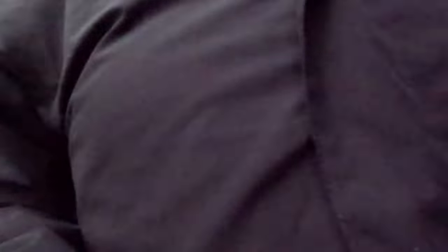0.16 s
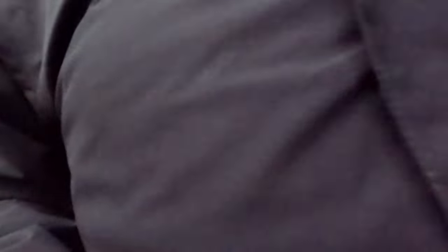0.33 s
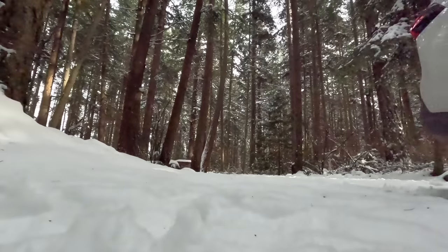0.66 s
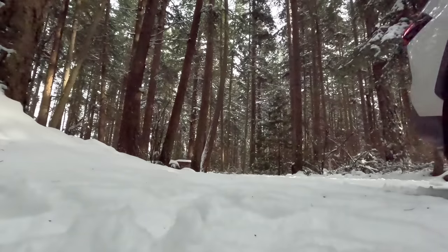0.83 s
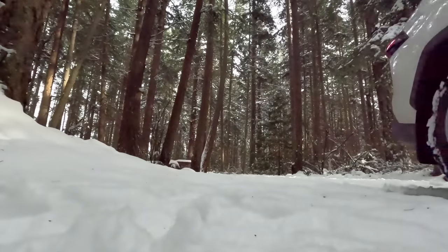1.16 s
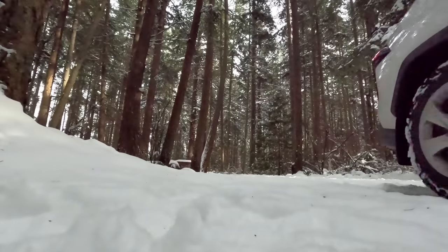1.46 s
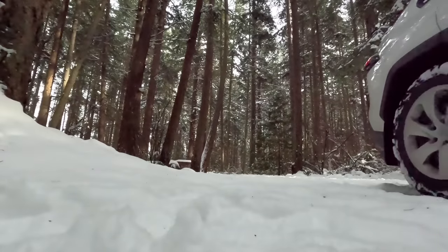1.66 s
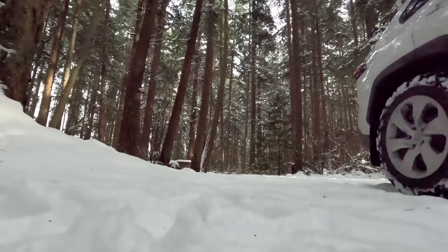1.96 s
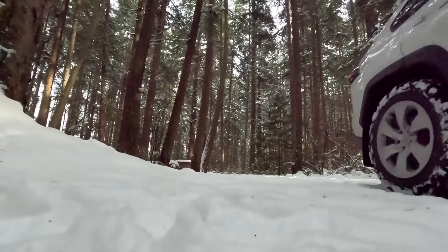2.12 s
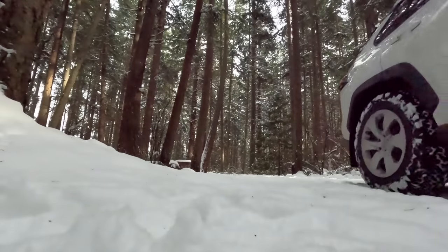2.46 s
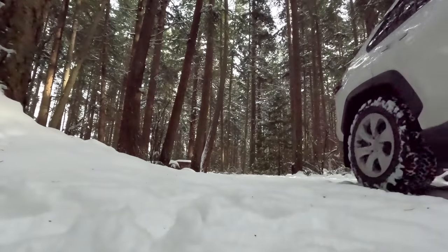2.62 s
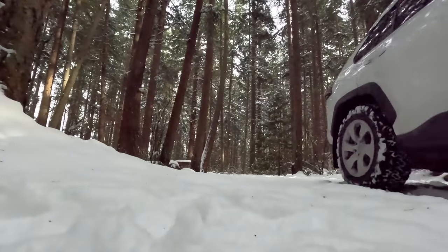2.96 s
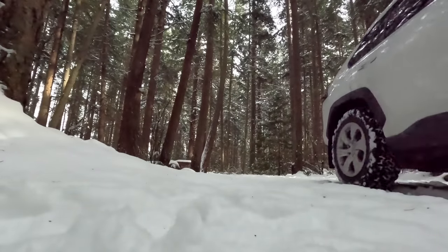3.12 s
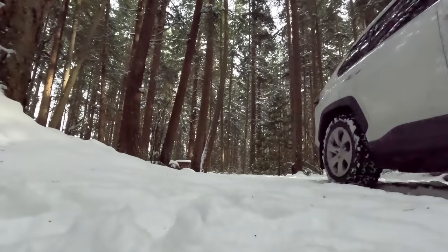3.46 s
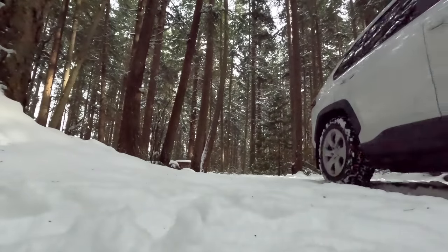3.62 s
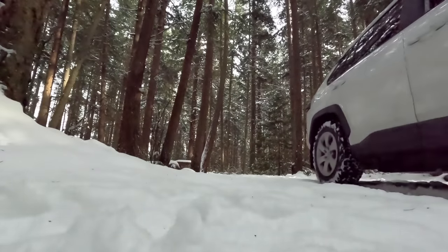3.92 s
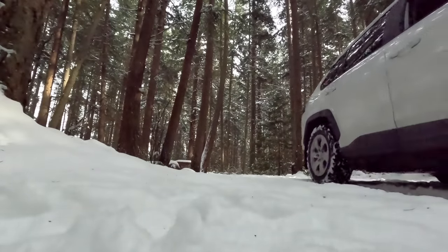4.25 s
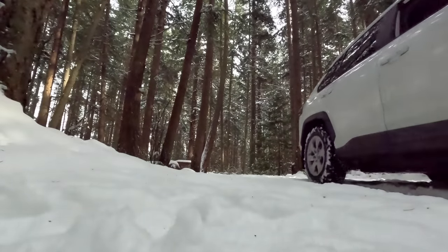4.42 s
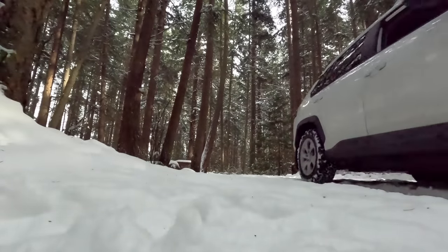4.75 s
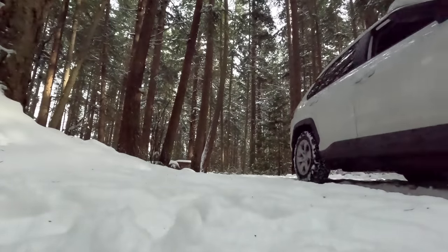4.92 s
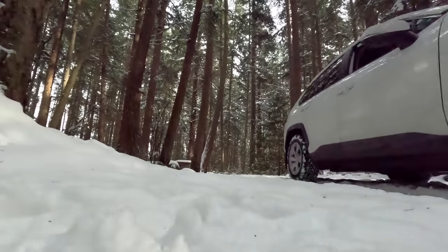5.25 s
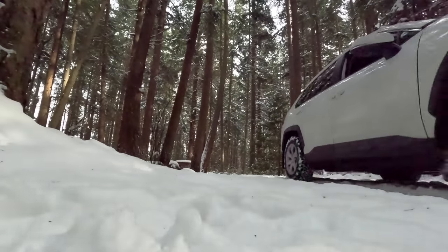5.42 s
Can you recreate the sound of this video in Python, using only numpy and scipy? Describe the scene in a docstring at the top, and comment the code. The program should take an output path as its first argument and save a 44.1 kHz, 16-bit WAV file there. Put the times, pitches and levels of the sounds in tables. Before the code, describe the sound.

A jacket and fingers rub and knock a small camera for under half a second, lumpy and scratchy. A tiny gap of dead silence follows, then a car backs slowly through a snowy forest: low throbbing exhaust, faint fan hum, dull thumps, snow crunching and ice crust cracking. Close to the ground, the stereo microphone catches engine rattle and hiss growing as the nose draws level, with a short rev late on.

```python
"""In a snowy forest, a jacket brushes a small camera as it is set down; after a short silence a car backs slowly.
The handling is lumpy and scratchy filtered noise, with knuckle bumps and cloth snaps.
The exhaust throb is a stack of sine waves that follows the engine speed; the fan hum is wavering tones.
Body roar, packed snow under the tyres, engine rattle and intake hiss are coloured, grainy noise.
Thumps, crunches and cracks are short ringing bursts; the engine bay hisses as the nose draws level."""
import sys
import numpy as np
from scipy import signal
from scipy.fft import rfft, irfft, next_fast_len
from scipy.io import wavfile
from scipy.ndimage import uniform_filter1d

SR = 44100
rng = np.random.default_rng(int(sys.argv[2]) if len(sys.argv) > 2 else 0)


def generate_wav(sig):
    """Save sig (samples, or channels by samples) to the path in sys.argv[1] as 16-bit PCM at SR."""
    pcm = np.round(np.clip(np.atleast_2d(sig).T, -1, 1) * 32767).astype(np.int16)
    wavfile.write(sys.argv[1], SR, pcm)


N = 246166
T = np.arange(N) / SR  # time in s
IDLE_HZ = 28  # engine firings per s at idle


def amp(db):
    """Turn dB into a plain multiplier for the wave."""
    return 10 ** (np.asarray(db) / 20)


def evened(x):
    """Scale a sound to an average (RMS) strength of 1."""
    return x / np.sqrt(np.mean(x ** 2) + 1e-20)


def read(points, hz):
    """Read a curve of (f/Hz, value) between its points, on a scale close to musical pitch."""
    f, value = np.transpose(points)
    return np.interp(np.log(hz + 1), np.log(f + 1), value)


def over_time(points):
    """Read a curve of (t/s, value) at every sample."""
    t, value = np.transpose(points)
    return np.interp(T, t, value)


def add(mix, s, sound):
    """Lay a short sound into the mix at s seconds, cut off at the end."""
    part = mix[:, round(s * SR):][:, :sound.shape[1]]
    part += sound[:, :part.shape[1]]


def drift(hz):
    """Slow, smooth chance: noise with only the rates below hz kept."""
    size = next_fast_len(N)
    keep = np.fft.rfftfreq(size, 1 / SR) < hz
    slow = irfft(keep * rfft(rng.standard_normal(size)), size)
    return evened(slow[:N])


def textured(spectrum, per_s, spread_db, wash, patchy_db, size=1024, held=False):
    """Grains of random size over a wash of noise, coloured and patchy, heard by two close ports."""
    # likeness of the two ports, 1 = same, in the hand: f/Hz, likeness
    same_held = [(60, 0.91), (400, 0.84), (1000, 0.93), (2700, 0.67), (4500, 0.96), (8500, 1),
                 (12000, 0.34)]
    # the same with the engine far, then alongside: f/Hz, likeness
    same_far = [(400, 1), (1300, 0.96), (2200, 0.81), (6000, 0.64), (9600, 0.56), (12000, 0.14)]
    same_near = [(60, 1), (400, .99), (1100, .9), (3000, .82), (4200, .58), (6500, .97), (10000, .94),
                 (12500, .6)]
    # left over right with the engine far, then alongside: f/Hz, level/dB
    lean_far = [(300, 0), (1300, 2), (2400, 2.5), (4400, 0)]
    lean_near = [(200, 0), (1300, -2), (4400, -4.5), (7000, -0.5)]
    # how far left leads with the engine alongside: f/Hz, phase/rad
    lead = [(500, -1.2), (2000, -0.3), (3300, -1.9), (4200, -2.5), (5200, -1.1)]
    # the engine draws level, on the clock that includes the lead-in: start/s, end/s
    approach = (4.1, 4.6)

    shape = (2, N + 2 * size)  # a lead-in and a tail of size samples, trimmed below
    sizes = amp(spread_db * np.minimum(rng.exponential(1, shape), 5))
    grains = sizes * (rng.random(shape) < per_s / SR) * rng.choice([-1., 1.], shape)
    wash = np.clip(wash, 0, 1)
    drive = np.sqrt(1 - wash) * evened(grains) + np.sqrt(wash) * rng.standard_normal(shape)
    hz, t, z = signal.stft(drive, SR, nperseg=size, noverlap=size * 3 // 4)

    # smooth chance over both pitch and time makes the patches
    patches = uniform_filter1d(rng.standard_normal(z.shape[1:]), size=12, axis=0)
    patches = evened(uniform_filter1d(patches, size=12, axis=1))

    near = np.interp(t, approach, [0, 1])
    if held:
        same = read(same_held, hz)[:, None]
    else:
        same = np.outer(read(same_far, hz), 1 - near) + np.outer(read(same_near, hz), near)
    same = np.clip(same, -1, 1)
    mid = np.sqrt((1 + same) / 2) * z[0]
    side = np.sqrt((1 - same) / 2) * z[1]
    lean_db = np.outer(read(lean_far, hz), 1 - near) + np.outer(read(lean_near, hz), near)
    # half of the lead and lean goes to each port, in opposite directions
    turn = np.exp(.5j * np.outer(read(lead, hz), near)) * amp(0 if held else lean_db / 2)
    ports = np.array([(mid + side) * turn, (mid - side) / turn])
    ports = ports * amp(read(spectrum, hz)[:, None] + patchy_db * patches)
    sound = signal.istft(ports, SR, nperseg=size, noverlap=size * 3 // 4)[1]
    return evened(sound[:, size:N + size])


def bursts(events, t60, sharpness, apart, top=8.2, fracture=0.61):
    """Each break is a fracture with a faint ragged tail, ringing around its centre and dull above top times that."""
    out, t = np.zeros((2, N)), np.arange(4096) / SR
    for s, db, hz in events:
        noise = rng.standard_normal((4, len(t)))
        ragged = amp(2.94 * evened(uniform_filter1d(noise[3], size=60)))
        fade = amp(-60 * t / t60) + amp(-17.5 - 16 * t / t60)  # a quick fall, then the faint tail
        puff = (noise[0] + apart * noise[1:3]) * ragged * fade  # apart sets how much the ports differ
        puff[:, 0] += fracture * np.linalg.norm(puff[0])  # the first click
        b, a = signal.iirpeak(hz, sharpness, SR)
        ring = signal.lfilter(b, a, signal.lfilter(b, a, puff))
        dulling = signal.butter(2, min(top * hz, 10500), fs=SR, output="sos")
        ring = signal.sosfilt(dulling, ring)
        add(out, s, amp(db) * ring / abs(ring).max())
    return out


def rubs():
    """Each rub starts and stops quickly and grows louder as the cloth tightens."""
    # cloth dragged over the case: start/s, length/s, final level/dB, swell during the rub/dB, dullness/0-1
    rub_rows = [(0, 0.026, -34, 3, 0.23), (0.029, 0.02, -15.5, 3, 0.91), (0.055, .088, -16, 10, 0.44),
                (0.153, .23, -34, 7.5, 0.26)]
    edge_s = 0.003  # fade just before and just after each rub
    level, dull = np.zeros(N), np.zeros(N)
    for s, length, db, swell_db, dullness in rub_rows:
        on = np.clip(np.minimum(T - s, s + length - T) / edge_s + 1, 0, 1)
        still_to_come = np.clip(1 - (T - s) / length, 0, 1)
        gain = on * amp(db - swell_db * still_to_come)
        level, dull = level + gain, dull + gain * dullness
    return level, np.clip(dull / (level + 1e-9), 0, 1)


def bumps():
    """Each bump pushes the case in and lets it spring back once: one fading sine cycle."""
    # knuckles on the case: t/s, level before the fade/dB, f/Hz
    bump_rows = [(.008, -9.5, 85), (.03, -11, 30), (.044, -9, 110), (.069, -13, 109.5), (.099, -13, 110),
                 (.138, -10, 110), (.343, -18, 130)]
    out = np.zeros(N)
    for s, db, hz in bump_rows:
        turn = np.clip((T - s) * hz, 0, 1)
        out -= amp(db - 8.0 * turn) * np.sin(2 * np.pi * turn)
    return out


def handling():
    """Fingers and cloth on the case: lumpy rumble, scratchy rustle, a few snaps."""
    # colour of the rumble, then of the rustle: f/Hz, relative level/dB per Hz
    rumble_spectrum = [(5, -28), (12, 8), (30, 3.5), (70, -9), (170, -11), (450, -27.5), (900, -58.5)]
    rustle_spectrum = [(180, -46), (300, -1.5), (2000, -11), (3500, -3), (5900, -2.5), (9640, -13),
                       (15000, -49)]
    # rumble through the case while it is held, before the left-right tilt: t/s, level/dB
    grip = [(0, -15.5), (.06, -13.5), (.105, -27), (.15, -17), (.19, -24), (.378, -22)]
    # cloth snaps: t/s, peak level/dB, centre f/Hz
    snap_rows = [(.031, -9.5, 450), (.046, -10.5, 1460), (.104, -7, 3970), (.134, -6, 3460),
                 (.193, -22, 706), (.268, -19, 5400), (.2715, -19.5, 970)]

    level, dull = rubs()
    rumble = textured(rumble_spectrum, 300, 2, wash=.8, patchy_db=1, size=4096, held=True)
    rustle = textured(rustle_spectrum, 3500, 2.9, wash=.62, patchy_db=1.8, size=256, held=True)
    muffled = evened(signal.lfilter(*signal.butter(2, 2500, fs=SR), rustle))
    rustle = np.sqrt(1 - dull) * rustle + np.sqrt(dull) * muffled
    snaps = bursts(snap_rows, 0.024, 0.58, apart=0.25)
    tilt = amp([[-.9], [.9]])  # left a little softer, right a little louder
    return tilt * (amp(over_time(grip)) * rumble + bumps()) + level * rustle + snaps


def exhaust(turns, hz):
    """Pressure builds and drops once a firing; the pipe rings on in the overtones, which lag."""
    # tailpipe colour of the overtones: f/Hz, relative level/dB
    pipe = [(50, 0), (85, -2), (112, -8), (140, -3), (170, -2), (197, 0), (222, -16), (340, -18)]
    # level of the overtones before the pipe's colour and the wavering: t/s, level/dB
    overtones = [(.49, -40), (1.6, -38), (2.8, -54.5), (3.93, -47.5), (4.45, -46), (5.58, -51.5)]
    # the body moves between tailpipe and microphone, softening the lowest tone
    shade_db = 5 / (1 + np.exp((2.1 - T) / 0.32))  # 5 dB in the end, halfway at 2.1 s
    # the lowest tone thins out as the engine speeds up
    throb_db = -28 - shade_db - 0.74 * (hz - IDLE_HZ)
    over_db = over_time(overtones)
    out = -amp(throb_db) * np.sin(2 * np.pi * turns)
    for k in range(2, 13):
        lag = .018 * k ** 3 + .2 * drift(3)  # radians
        level_db = over_db + read(pipe, k * hz) + 1.6 * drift(5)
        out -= amp(level_db) * np.sin(2 * np.pi * k * turns - lag)
    return np.sqrt(2) * out


def hum(tones, waver_db):
    """Steady tones that waver a little in level and phase."""
    out = np.zeros(N)
    for hz, db in tones:
        level = amp(db + waver_db * drift(7))
        out += level * np.sin(2 * np.pi * hz * T + .8 * drift(4))
    return np.sqrt(2) * out


def fan():
    """The fan swells as the nose comes near, over an even hum."""
    # the fan's tones: f/Hz, relative level/dB
    fan_tones = [(168, 1.5), (473, -15)]
    # a fainter, even hum: f/Hz, level before the wavering/dB
    even_tones = [(337, -50.5)]
    quietest_db, swell_db, quietest_s = -49, 10, 1.6  # gain, its swell by the end, time of the lowest
    swell = ((T - quietest_s) / (T[-1] - quietest_s)) ** 2
    return amp(quietest_db + swell_db * swell) * hum(fan_tones, waver_db=2.2) + hum(even_tones, waver_db=0.8)


def body_roar():
    """The low roar of the body: deep noise that rises and falls."""
    # colour of the roar: f/Hz, relative level/dB per Hz
    roar_spectrum = [(8, -16), (25, -7), (50, 4), (170, -1.5), (340, -8), (520, -21.5), (880, -88)]
    # loudness of the roar: t/s, level/dB
    body = [(.49, -57), (1.12, -30.5), (1.45, -43), (1.7, -46.5), (2, -39.5), (2.85, -37.5), (3.3, -32.5),
            (4.6, -34.5), (5.3, -39), (5.58, -31)]
    return amp(over_time(body)) * textured(roar_spectrum, 80, 3, wash=.9, patchy_db=1, size=4096)


def tyre_crush():
    """Tyres crush packed snow: many small grains over a low wash of noise."""
    # colour of the crushing: f/Hz, relative level/dB per Hz
    crush_spectrum = [(88, -44), (150, -3), (265, -9.5), (357, -12.5), (472, -9), (1500, -33), (1950, -50),
                      (3300, -120)]
    # loudness of the crushing: t/s, level/dB
    tyres = [(.49, -48), (.75, -45), (1.5, -44), (2.6, -37.5), (3.6, -36.5), (4.2, -37.5), (4.7, -35),
             (5, -36), (5.58, -38)]
    return amp(over_time(tyres)) * textured(crush_spectrum, 700, 3.1, wash=0.61, patchy_db=2.0)


def clatter(turns):
    """Each firing knocks the block; its modes ring unevenly, now one and now another, over a fine even rattle."""
    # colour of the rattle: f/Hz, relative level/dB per Hz
    rattle_spectrum = [(410, -5.5), (700, -2), (1110, -9.5), (1760, -9), (3130, -11), (3870, -12),
                       (4700, -23.5), (6500, -54), (11000, -120)]
    # block modes rung by each firing: f/Hz, width/Hz, relative level/dB
    block = [(1707, 170, 4), (2015, 120, 1.5), (2585, 200, -1), (3150, 200, -1.5)]
    # loudness of the whole clatter: t/s, level/dB
    bay = [(.49, -60), (1.45, -58), (2, -53), (2.85, -49.5), (3.5, -49), (4.25, -48), (4.55, -41),
           (5, -44.5), (5.58, -50.5)]

    firings = int(turns[-1]) + 2
    strength = amp(2.5 * rng.standard_normal((firings, len(block))))  # each firing hits each mode anew
    strength = strength[turns.astype(int)].T
    knock = uniform_filter1d(np.exp(-(turns % 1) / 0.2), size=130)
    rattle = textured(rattle_spectrum, 4000, 2.2, wash=.7, patchy_db=1.2)
    rings = np.zeros((2, N))
    for hit, (hz, width, db) in zip(strength, block):
        b, a = signal.iirpeak(hz, hz / width, SR)
        ring = evened(signal.lfilter(b, a, (0.37 + hit * knock) * rattle))
        rings += amp(db + 2.9 * drift(4)) * ring
    # the modes stand out while the engine's flank is near
    share = np.interp(T, (2.6, 4.1, 5.1), [.2, .55, .15])
    return amp(over_time(bay)) * evened(evened((1.3 + knock) * rattle) + share * evened(rings))


def intake_hiss(turns, hz):
    """Air hisses into the intake, pulsing with each firing and loudest as the nose passes."""
    # colour of the hiss: f/Hz, relative level/dB per Hz
    hiss_spectrum = [(1760, -13), (3000, -2.5), (4630, -6.5), (5800, -5.5), (6500, -9), (7400, -8),
                     (9000, -15), (12200, -27.5), (15500, -50)]
    nearest_s, lane_s = 5.02, .72  # moment of passing; time to move by the passing distance
    breath_db = 1.4 * np.cos(2 * np.pi * turns)  # the intake draws once a firing
    distance_db = 10 * np.log10(1 + ((T - nearest_s) / lane_s) ** 2)
    hiss_db = -52.5 - distance_db + 0.4 * (hz - IDLE_HZ)  # louder as the engine speeds up
    return amp(hiss_db + breath_db) * textured(hiss_spectrum, 1500, 2.8, wash=0.78, patchy_db=1.9)


def grit():
    """Fine crust crackles in clumps all along the tyres' track."""
    # colour of the crackle: f/Hz, relative level/dB per Hz
    grit_spectrum = [(2600, -13), (4500, 2.5), (7000, -1), (10500, -9), (13000, -22), (15000, -40)]
    clumps = amp(2.2 * drift(14))
    return amp(-71.5) * clumps * textured(grit_spectrum, 900, 2.6, wash=0.65, patchy_db=1.0, size=256)


def snow_breaks():
    """Snow lumps give way, ice crust cracks and the car thumps: short bursts, each ringing at its own pitch."""
    # lumps of snow giving way: t/s, peak level/dB, centre f/Hz
    crunch_rows = [(0.776, -29.5, 746), (0.932, -39.5, 1000), (1.991, -33, 670), (2.214, -31, 650),
                   (2.443, -24.5, 610), (2.767, -25, 705), (2.823, -22.5, 744), (2.909, -29, 1000),
                   (3.271, -32.5, 1190), (3.293, -24, 990), (3.311, -31.5, 900), (3.477, -23.5, 785),
                   (3.978, -31, 600), (4.163, -30, 670), (4.542, -31, 904), (5.246, -30, 660)]
    # ice crust cracking: t/s, peak level/dB, centre f/Hz
    crack_rows = [(1.147, -41, 8000), (1.221, -39.5, 7400), (1.335, -45, 7000), (1.485, -49, 7500),
                  (1.563, -49.5, 5460), (1.667, -48, 8000), (1.847, -35.5, 2600), (2.63, -37, 5300),
                  (3.184, -35, 4500), (3.198, -34, 4000), (3.349, -22.5, 3480), (3.474, -33.5, 3850),
                  (3.488, -34, 3460), (3.552, -24.5, 3350), (3.579, -27.5, 3030), (3.598, -41, 4500),
                  (3.715, -37, 5000), (3.843, -39, 4485), (3.912, -33, 4200), (4.16, -32, 4100),
                  (4.74, -32, 4000), (4.86, -30, 4200)]
    # low thumps under the car: t/s, peak level/dB, centre f/Hz
    thud_rows = [(0.905, -29.5, 232), (1.097, -23.5, 230), (1.165, -23.5, 228), (1.248, -24, 252),
                 (1.336, -26.5, 250), (1.417, -25.5, 263), (2.911, -24.5, 438), (3.716, -21.5, 244)]
    crunches = bursts(crunch_rows, 0.06, 1.0, apart=0.24, top=1.43, fracture=.75)
    cracks = bursts(crack_rows, 0.03, 0.85, apart=0.42, fracture=.9)
    thuds = bursts(thud_rows, 0.063, 2.23, apart=0.077, top=2.4, fracture=1.5)
    return crunches + cracks + thuds


def car():
    """One engine speed drives exhaust, clatter and hiss; fan, body roar and snow join them."""
    # engine speed: t/s, firing rate/Hz
    engine_speed = [(.49, 27.8), (.97, 27.9), (1.25, 26.7), (1.6, 25.5), (1.86, 27.6), (2.05, 28.9),
                    (2.54, 30.5), (2.8, 28.5), (3.07, 29.5), (3.36, 28.7), (3.64, 27.3), (3.93, 25.5),
                    (4.15, 27.2), (4.45, 29.7), (4.8, 37.3), (4.96, 36), (5.25, 30), (5.58, 26.2)]
    hz = over_time(engine_speed)
    turns = np.cumsum(hz) / SR + 0.303  # firings counted so far, from a starting offset
    engine = exhaust(turns, hz) + fan() + clatter(turns + 0.445) + intake_hiss(turns, hz)
    snow = tyre_crush() + grit() + snow_breaks()
    return engine + body_roar() + snow


def scene():
    """Handling, an abrupt silence, then the car."""
    # the silence: start/s, end/s
    silence = (.378, .4907)
    return handling() * (T < silence[0]) + car() * (T > silence[1])


def record(dry):
    """The band limit: nearly everything above 15 kHz is filtered away."""
    low_pass = signal.firwin(511, 15000, window=("kaiser", 9), fs=SR)
    return signal.oaconvolve(dry, low_pass[None], "same")


dry = scene()
out = record(dry)
generate_wav(out)
```